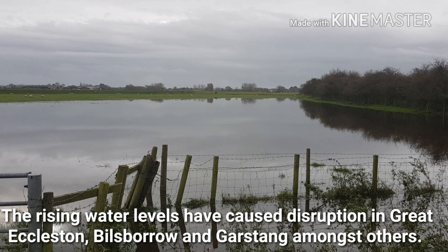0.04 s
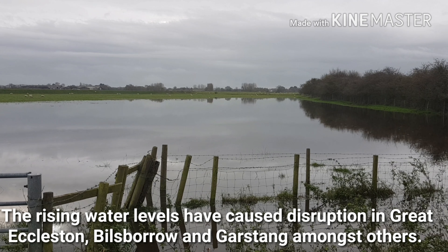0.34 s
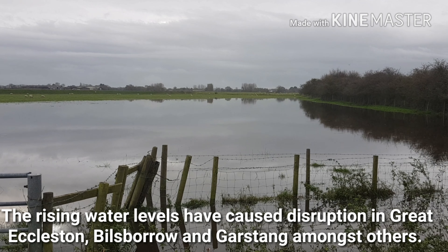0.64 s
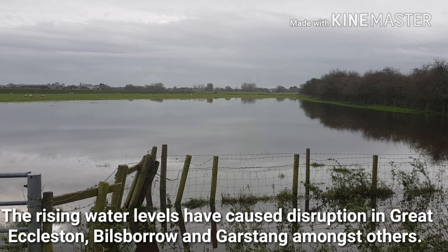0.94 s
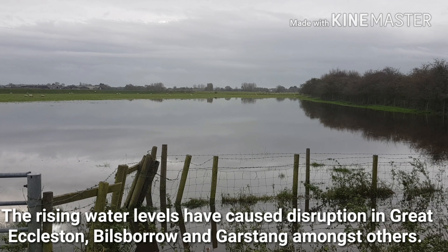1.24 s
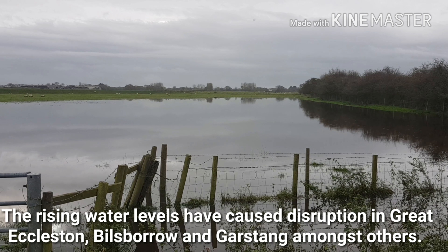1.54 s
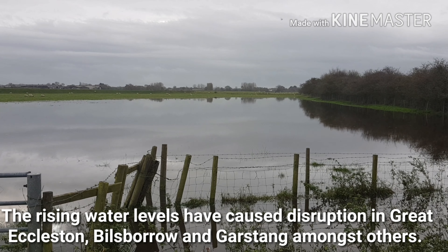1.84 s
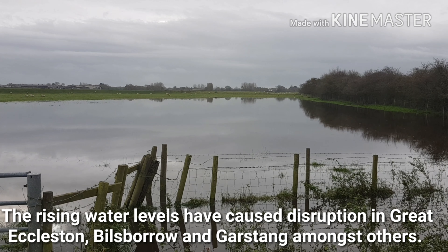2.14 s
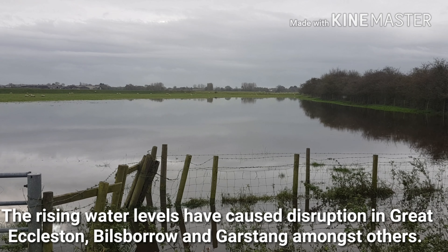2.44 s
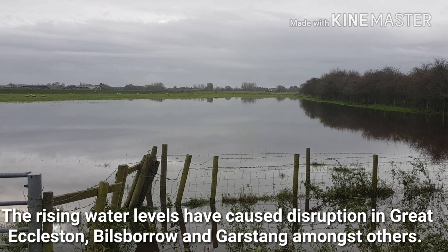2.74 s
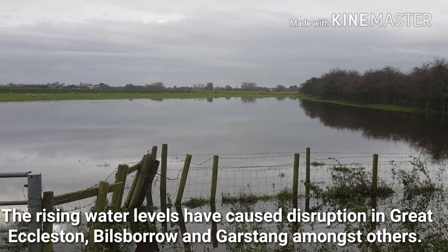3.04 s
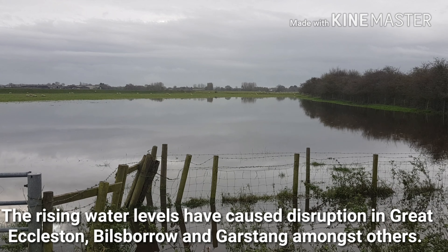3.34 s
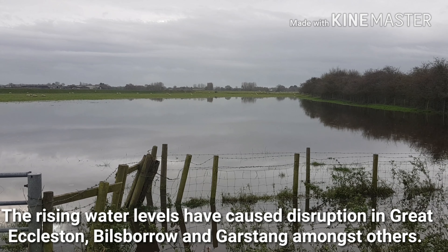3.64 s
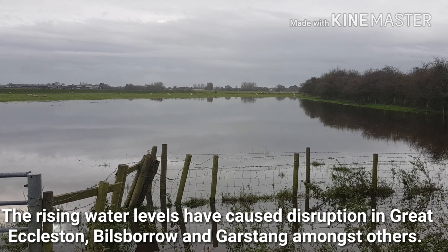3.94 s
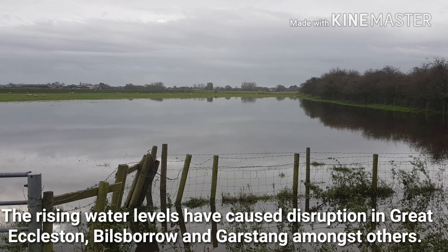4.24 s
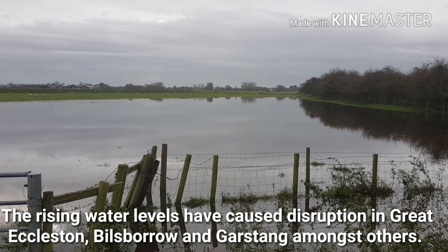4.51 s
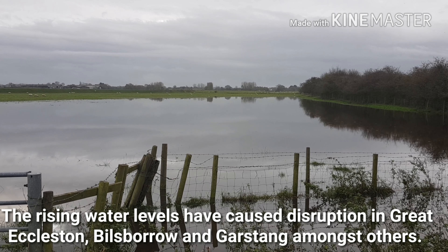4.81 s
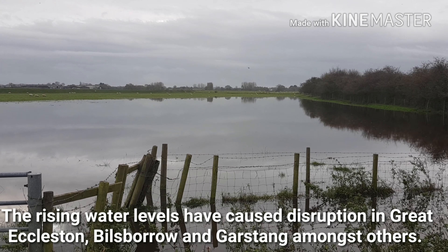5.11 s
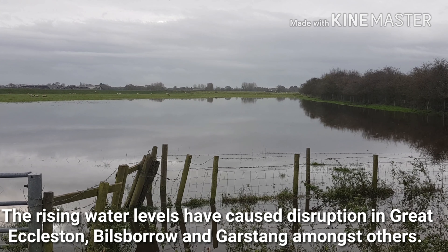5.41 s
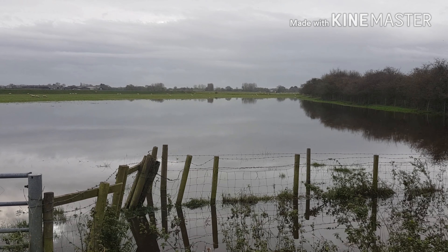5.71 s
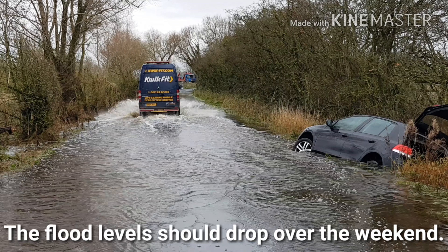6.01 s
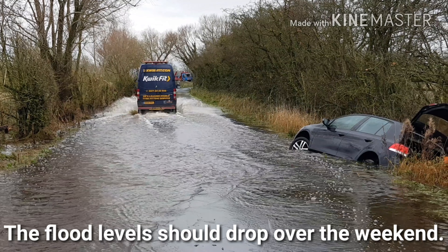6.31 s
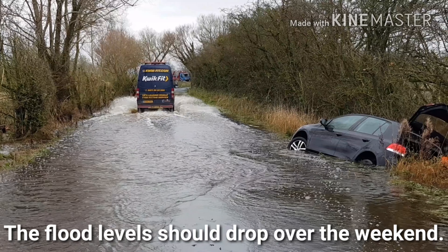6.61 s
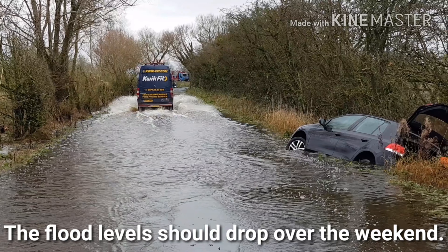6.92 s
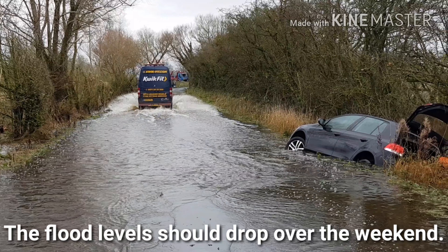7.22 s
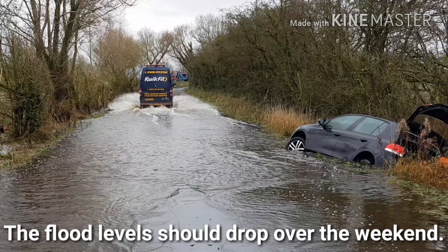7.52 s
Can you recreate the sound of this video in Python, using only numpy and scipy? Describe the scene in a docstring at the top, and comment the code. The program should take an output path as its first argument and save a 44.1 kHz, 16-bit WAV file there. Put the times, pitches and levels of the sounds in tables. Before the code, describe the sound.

Small birds twitter and whistle quietly outdoors over soft wind, faint hiss and a distant road. Early on, dull handling bumps strike right at the microphone, the last much the strongest. After more high calls, the calm stops abruptly with a thud of wind. A far louder, steady rush of churned water follows, full of spray and bubbles, as a van wades away along a flooded lane.

```python
"""A low breeze, a far road and small birds in a hedge, heard from beside a flooded field.
A few soft bumps ring the body of the camera that carries the microphone.
Near six seconds the scene cuts to a flooded lane, where a van wades away: its wash rushes and
splashes with ringing bubbles, and gusts buffet the microphone."""
import sys
import numpy as np
from scipy import signal
from scipy.fft import rfft, irfft
from scipy.io import wavfile
from scipy.ndimage import uniform_filter1d

SR = 44100
rng = np.random.default_rng(int(sys.argv[2]) if len(sys.argv) > 2 else 0)


def inscribe(sig):
    """Save sig as 16-bit PCM at rate SR to the path in sys.argv[1].

    A 1-D sig is mono; a 2-D sig holds one channel per row.
    Samples are clipped to [-1, 1] before scaling.
    """
    pcm = np.round(np.clip(np.atleast_2d(sig).T, -1, 1) * 32767)
    wavfile.write(sys.argv[1], SR, pcm.astype(np.int16))


N = 337806
TIME = np.arange(N) / SR
FIELD_END_S, LANE_START_S = 5.864, 5.893

# Low wind over the field. Each row: frequency in Hz, relative level in dB.
BREEZE_SPECTRUM = [(20, -11), (50, -3.5), (88, -1), (135, -6), (200, -13), (310, -15), (380, -23.5),
                   (460, -27.5), (600, -33.5)]
# Faint high hiss behind the field. Each row: frequency in Hz, relative level in dB.
HISS_SPECTRUM = [(1800, -4.5), (3000, -3), (4500, -3), (5500, 0.5), (7000, 3), (9700, 2.5), (10300, -3.5),
                 (12000, -6), (15500, -8.5)]
# Cars on the far road. Each row: time when nearest in seconds, seconds from there until the roar is
# 3 dB down, roar level in dB, tyre song level in dB.
CAR_PASSES = [(.62, 0.52, -68.5, -65), (1.48, 0.35, -65, -73), (2.46, .27, -66.5, -62.5),
              (3.78, 0.53, -68.5, -74.5), (5.5, 0.43, -71, -82)]
# The road's roar, its singing tyres and one engine. Each row: frequency in Hz, relative level in dB.
ROAR_SPECTRUM = [(450, -8.5), (650, -6), (800, 0.5), (950, -2), (1150, -2), (1400, -11.5), (1800, -19),
                 (2400, -26)]
TYRE_SPECTRUM = [(900, -10.5), (1150, 4), (1320, 1), (1550, -5.5), (1900, -24)]
ENGINE_SPECTRUM = [(190, -11.5), (265, 0), (330, -3), (420, -12)]

# Thin high calls of the flock in the hedge.
# Each row: start in seconds, length in seconds, middle pitch in Hz, level in dB, rasp from 0 to 1.
SEEP_CALLS = [(0, 0.023, 7300, -61, .3), (0.124, .1, 7800, -59, .7), (2.639, .11, 7950, -69, .5),
              (2.774, .11, 7750, -63, .3), (3.131, 0.13, 8430, -69, .3), (3.321, .1, 8200, -68, 0.32),
              (3.419, .1, 7750, -66, 0.2), (4.035, 0.057, 7300, -62, 1), (4.191, 0.073, 6880, -61, 0.26),
              (4.234, .14, 7780, -58.5, .6), (4.387, .12, 7180, -59, .55), (4.358, .05, 5950, -67, 0.37),
              (4.478, .055, 5950, -60.5, .8), (4.578, 0.073, 7350, -59.5, 0.32),
              (4.633, .17, 7800, -63.5, .5), (4.962, .13, 7960, -64, 0.62), (5.189, .13, 7950, -64.5, 0.76)]
# Plain whistles. Each row: start in seconds, length in seconds, middle pitch in Hz, slide in Hz,
# level in dB, rasp from 0 to 1.
WHISTLE_CALLS = [(0.091, .028, 4460, -200, -67, 0.4), (0.099, 0.075, 7800, -40, -61, .05),
                 (0.144, 0.043, 4700, -350, -61.5, .55), (.2, 0.12, 3900, -80, -64, 0.23),
                 (0.344, 0.054, 4230, 120, -57.5, 0.34), (.572, .05, 4870, -600, -60, 0.5),
                 (.596, 0.088, 4274, 0, -62.5, .15), (3.241, 0.044, 6160, -60, -59.5, 0.14),
                 (3.38, .11, 3214, -300, -73.5, .85), (3.859, 0.25, 3835, 90, -68.5, .8),
                 (3.886, .033, 3060, -120, -64.5, 0.2), (4.979, .08, 3195, 150, -64.5, .45),
                 (5.06, 0.19, 3480, 450, -74, .8)]
# Hoarse chips, each a steep downward flick. Each row: start in seconds, first pitch in Hz, level in dB.
CHIP_CALLS = [(.095, 10360, -65), (.275, 7000, -71), (3.035, 7700, -70.5), (4.612, 6900, -63),
              (4.67, 5200, -70), (4.74, 5600, -74), (5.344, 4900, -68.5), (5.488, 5020, -68),
              (5.606, 4970, -66), (5.706, 5100, -67.5)]
# The bird nearest the microphone warbles in arches of pitch. Each row: start in seconds, length in
# seconds, top pitch in Hz, place of the top as a share of the length, level in dB, rasp from 0 to 1.
WARBLE_SYLLABLES = [(0.309, 0.048, 4210, 0.9, -60.5, .55), (.5, 0.069, 4510, .15, -59, 0.55),
                    (.57, 0.044, 4450, .95, -57.5, .2), (0.682, .054, 3670, .2, -49.5, .08),
                    (0.807, .06, 3350, .1, -65, .25), (.942, .078, 4016, .48, -52, 0.15)]
# The same bird dives in pitch and curls up again.
# Each row: start in seconds, length in seconds, first pitch in Hz, level in dB, rasp from 0 to 1.
SWOOP_CALLS = [(0.616, .075, 5300, -58.5, 0.33), (1.018, .115, 5000, -52.5, 0.19)]
# A scolding churr. Each row: start in seconds, length in seconds, first pitch in Hz, level in dB.
CHURR_BURSTS = [(3.53, .1, 4450, -56), (3.645, .062, 4360, -54), (3.718, .15, 3850, -63)]

# Soft bumps on the camera, right at the microphone.
# Each row: start in seconds, peak level in dB, contact time in seconds, factor on the decay times.
CAMERA_BUMPS = [(.427, -39, 0.0074, 0.92), (.527, -35, 0.0035, 2.5), (.745, -42, 0.0042, 0.84),
                (1.051, -26, 0.0018, 1.5), (1.245, -37, 0.0037, .8), (1.27, -29, 0.0026, 1.4),
                (1.369, -28.5, 0.0029, 1.1), (1.402, -30, 0.0058, 1), (1.524, -10.5, 0.0015, 1.17)]
# Modes of the camera and its holder.
# Each row: frequency in Hz, relative level in dB, seconds to fall by 60 dB.
CAMERA_MODES = [(50, -3, 0.092), (91, 2.5, 0.07), (116.8, 1, 0.079), (245, -14, 0.05), (401, -8, 0.023),
                (700, -23, .012), (1100, -40, .01)]
# Bouts of twitter, far from the microphone.
# Each row: start in seconds, end in seconds, centre pitch in Hz, notes per second, note level in dB.
TWITTER_BOUTS = [(0.751, 2.3, 8390, 4, -75), (2.6, 3.499, 7800, 28, -72), (3.35, 4.052, 3100, 12, -74.5),
                 (3.5, 4.049, 2446, 10, -81), (4.149, 4.901, 7680, 36, -69)]
# Eddies on the microphone. Each row: start in seconds, level in dB, throb in Hz, seconds to fall 60 dB.
MICROPHONE_GUSTS = [(2.28, -40, 51.7, .45), (5.846, -14.5, 69, 0.061), (6.103, -21, 49.7, 0.33)]
# The van's wash in the lane, low rush and high spray. Each row: frequency in Hz, relative level in dB.
RUSH_SPECTRUM = [(20, -11), (45, -8), (80, -6.5), (130, -1), (175, 0.5), (260, -1.5), (370, -3.5),
                 (600, -4), (1050, -6), (1500, -10.5), (2000, -14.5), (2500, -20)]
SPRAY_SPECTRUM = [(1470, -61), (2500, -1), (3920, -3.5), (4820, -2), (5360, -5.5), (6010, -13), (8340, -8),
                  (9500, -19), (12600, -21), (14600, -32), (15500, -40)]


def gain_of(db):
    """Decibels to amplitude."""
    return 10 ** (np.asarray(db) / 20)


def unit_rms(x):
    """Scales to rms 1."""
    return x / np.sqrt(np.mean(x ** 2) + 1e-20)


def add(mix, start, sound):
    """Mixes a sound in at a start time in seconds."""
    part = mix[max(round(start * SR), 0):][:len(sound)]
    part += sound[:len(part)]


def colour(x, spectrum):
    """Filters by a spectrum that falls 60 dB an octave past its ends; the result has rms 1."""
    hz, db = np.transpose(spectrum)
    octave, known = np.log2(np.fft.rfftfreq(N, 1 / SR) + 1), np.log2(hz + 1)
    octaves_outside = abs(octave - np.clip(octave, known[0], known[-1]))
    response = gain_of(np.interp(octave, known, db) - 60 * octaves_outside)
    return unit_rms(irfft(rfft(x) * response, N))


def noise(spectrum, patchy_db):
    """Coloured noise whose level drifts in patches of time and frequency."""
    frames = dict(nperseg=1024, noverlap=768)
    bins = signal.stft(rng.standard_normal(N), **frames)[2]
    patches = uniform_filter1d(rng.standard_normal(bins.shape), size=10, axis=0)
    patches = unit_rms(uniform_filter1d(patches, size=12, axis=1))
    patchy = signal.istft(bins * gain_of(patchy_db * patches), **frames)[1][:N]
    return colour(patchy, spectrum)


def breeze(ease_db_per_s=0.5, rumble_s=1.42, rumble_width_s=0.2, rumble_db=3.2):
    """A low rumble swells once around the camera bumps, over a slowly easing breeze."""
    rumble = rumble_db * np.exp(-((TIME - rumble_s) / rumble_width_s) ** 2)
    return gain_of(-49 - ease_db_per_s * TIME + rumble) * noise(BREEZE_SPECTRUM, patchy_db=1.34)


def hiss():
    """A faint, steady hiss lies behind the field."""
    return gain_of(-72) * colour(rng.standard_normal(N), HISS_SPECTRUM)


def nearness(nearest_s, half_s):
    """Gain of a source passing in a straight line, 1 when it is nearest the microphone."""
    return 1 / np.hypot(1, (TIME - nearest_s) / half_s)


def far_road():
    """Each car's roar swells and fades with distance; its tyres sing when nearest. One engine drones."""
    roar_power = sum((gain_of(db) * nearness(at, half)) ** 2 for at, half, db, _ in CAR_PASSES)
    tyre_power = sum((gain_of(db) * nearness(at, half) ** 2) ** 2 for at, half, _, db in CAR_PASSES)
    engine = gain_of(-64.5) * nearness(nearest_s=3.0, half_s=0.58) * noise(ENGINE_SPECTRUM, patchy_db=1.5)
    roar = np.sqrt(roar_power) * noise(ROAR_SPECTRUM, patchy_db=2)
    tyres = np.sqrt(tyre_power) * noise(TYRE_SPECTRUM, patchy_db=2)
    return roar + tyres + engine


def progress(length_s):
    """Runs from 0 to 1 over a note."""
    return np.linspace(0, 1, max(round(length_s * SR), 200))


def bird_calls(sag_hz=1400, rest_hz=2920, dive_s=0.024, curl_hz=320, churr_hz=3550):
    """Each kind of call has its own pitch shape; yields start, pitch curve, level and rasp per note."""
    for start, length, hz, db, rasp in SEEP_CALLS:  # the harsher the call, the further it sags
        yield start, hz - sag_hz * rasp * (progress(length) - 0.5), db, rasp
    for start, length, hz, slide, db, rasp in WHISTLE_CALLS:
        yield start, hz + slide * (progress(length) - 0.5), db, rasp
    for start, first_hz, db in CHIP_CALLS:
        yield start, first_hz * (1 - 0.35 * progress(length_s=0.062)), db, 0.99
    for start, length, top_hz, top_at, db, rasp in WARBLE_SYLLABLES:
        arch = np.sin(np.pi * np.interp(progress(length), [0, top_at, 1], [0, 0.5, 1]))
        yield start, rest_hz + (top_hz - rest_hz) * arch, db, rasp
    for start, length, first_hz, db, rasp in SWOOP_CALLS:
        height = np.exp(-(progress(length) * length / dive_s) ** 2)
        pitch = rest_hz + (first_hz - rest_hz) * height + curl_hz * progress(length) ** 3
        yield start, pitch, db - 6 * height, rasp  # louder as it dives
    for start, length, first_hz, db in CHURR_BURSTS:  # each burst settles on one pitch
        yield start, churr_hz + (first_hz - churr_hz) * (1 - progress(length)) ** 2, db, 0.94


def bird_note(hz, db, rasp):
    """A whistle along a pitch curve; fast flutter of the syrinx makes it rasp."""
    flutter = unit_rms(uniform_filter1d(rng.standard_normal(SR), size=40))[:len(hz)]
    tone = np.sin(2 * np.pi * np.cumsum(hz * (1 + 0.054 * rasp * flutter)) / SR)
    return gain_of(db) * unit_rms(tone * signal.windows.tukey(len(hz), 0.5))


def hedge_echoes(x, t60, echoes_per_s=700):
    """Trunks and branches scatter sparse echoes that fall by 60 dB in t60 seconds."""
    t = TIME[:SR]
    taps = rng.standard_normal(SR) * (rng.random(SR) < echoes_per_s / SR)
    taps *= gain_of(-60 * t / t60) * (t > 0.003)
    return signal.fftconvolve(x, taps / np.linalg.norm(taps))[:N]


def hedge_birds():
    """Clear notes reach the microphone from the hedge's open edge, rasps smeared from deep inside."""
    edge, inside = np.zeros((2, N))
    for start, hz, db, rasp in bird_calls():
        note = bird_note(hz, db, rasp)
        direct = 1 - rasp
        add(edge, start, direct * note)
        add(inside, start, np.sqrt(1 - direct ** 2) * note)
    smear = gain_of(-2.5) * hedge_echoes(inside, t60=0.09)
    inside_tail = gain_of(-5) * hedge_echoes(inside, t60=0.55)
    edge_tail = gain_of(-14) * hedge_echoes(edge, t60=0.65)
    return edge + smear + inside_tail + edge_tail


def camera_bumps():
    """Each push rings the camera's body; a longer contact is duller, and a scuff marks the touch."""
    out, t = np.zeros(N), TIME[:SR // 3]
    scuff = colour(rng.standard_normal(N), [(400, 0.5), (1000, -6), (2500, -34), (4000, -47)])
    for start, db, contact_s, decay_factor in CAMERA_BUMPS:
        ring = sum((-1) ** k * gain_of(level - 60 * t / (t60 * decay_factor)) * np.sin(2 * np.pi * hz * t)
                   for k, (hz, level, t60) in enumerate(CAMERA_MODES))
        push = np.hanning(round(contact_s * SR) + 3)
        thud = np.convolve(ring, push)[:len(t)]
        touch = scuff[round(start * SR):][:len(t)] * (t / 0.003) ** 2 * np.exp(-t / 0.002)
        add(out, start, gain_of(db) * (thud / abs(thud).max() + gain_of(-24) * touch))
    return out


def far_twitter(pitch_spread=0.09, pitch_bend=0.04):
    """The rest of the flock: many tiny falling notes, far off and blurred by echoes."""
    flock = np.zeros(N)
    fall = 1 - 2 * progress(length_s=0.035)
    for start, end, centre_hz, per_s, db in TWITTER_BOUTS:
        for when, pitch, bend in rng.random((round(per_s * (end - start)), 3)):
            hz = centre_hz * (1 + pitch_spread * (2 * pitch - 1) + pitch_bend * bend * fall)
            add(flock, start + when * (end - start), bird_note(hz, db, rasp=0.19))
    return hedge_echoes(flock, t60=0.27)


def gusts(attack_s=0.0063):
    """Eddies strike the microphone and throb away."""
    out, t = np.zeros(N), TIME[:SR // 2]
    for start, db, hz, t60 in MICROPHONE_GUSTS:
        churn = noise([(20, 1), (90, -2.5), (280, -13.5)], patchy_db=0)[:len(t)]
        envelope = gain_of(db - 60 * t / t60) * np.minimum(t / attack_s, 1)
        add(out, start, envelope * (np.sin(2 * np.pi * hz * t) + 0.36 * churn))
    return out


def bubbles(low_hz, high_hz, per_s, cycles, spread_db, sizes=28):
    """Bubbles of many sizes, each a short damped ring that rises in pitch; a few are loud."""
    out = np.zeros(N)
    for hz in np.geomspace(low_hz, high_hz, sizes):
        age = np.linspace(0, 1, round(cycles * SR / hz) + 4)
        ring = np.sin(2 * np.pi * cycles * age * (1 + 0.066 * age)) * np.exp(-5 * age)
        onsets = rng.integers(0, N, round(per_s * N / SR / sizes))
        strengths = gain_of(spread_db * np.minimum(rng.exponential(1, len(onsets)), 4))
        births = np.bincount(onsets, strengths * rng.choice([-1, 1], len(onsets)), N)
        out += signal.oaconvolve(births, ring * np.sqrt(hz) / np.linalg.norm(ring))[:N]
    return out


def van_wash(recede_db_per_s=0.2):
    """Churned water roars and gurgles under a brighter spray, easing as the van wades down the lane."""
    gurgle = colour(bubbles(348.5, 2635, per_s=700, cycles=17, spread_db=3.5), RUSH_SPECTRUM)
    droplets = colour(bubbles(2290, 16000, per_s=3500, cycles=15, spread_db=1), SPRAY_SPECTRUM)
    rush = gain_of(-0.43) * noise(RUSH_SPECTRUM, patchy_db=1.5) + gain_of(-8) * gurgle
    spray = gain_of(-1) * noise(SPRAY_SPECTRUM, patchy_db=0.6) + gain_of(-3.5) * droplets
    receding = gain_of(-recede_db_per_s * (TIME - LANE_START_S))
    return receding * (gain_of(-31.4) * rush + gain_of(-43.5) * spray)


def scene(cut_s=0.0039, fade_in_s=0.13):
    """Two microphone positions: the field stops short, the lane fades in. Both channels are alike."""
    field_on = np.clip((FIELD_END_S - TIME) / cut_s, 0, 1)
    lane_on = np.interp(TIME, [LANE_START_S, LANE_START_S + fade_in_s], [0.05, 1], left=0)
    field = breeze() + hiss() + far_road() + hedge_birds() + camera_bumps() + far_twitter()
    mono = field_on * field + lane_on * van_wash() + (field_on + lane_on) * gusts()
    return np.array([mono, mono])


def record(dry, top_hz=15550):
    """A trace of treble hiss differs between the channels; the highest treble is cut off."""
    side = gain_of(-83) * noise([(1500, -2), (4000, -1), (8000, 6), (15500, -1)], patchy_db=2)
    lowpass = signal.firwin(511, top_hz, window=("kaiser", 9), fs=SR)
    return signal.oaconvolve(dry + np.array([side, -side]), lowpass[None], "same")


dry = scene()
out = record(dry)
inscribe(out)
```